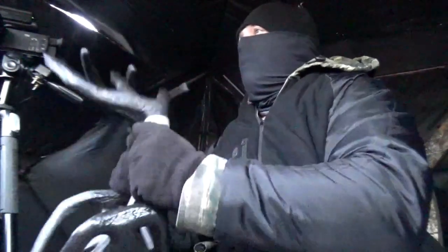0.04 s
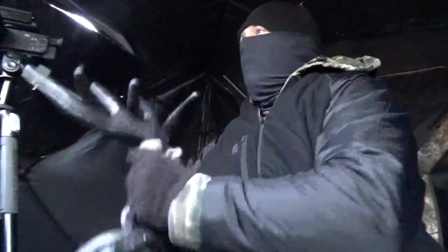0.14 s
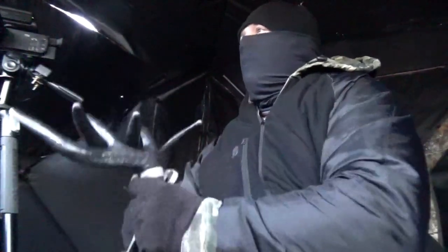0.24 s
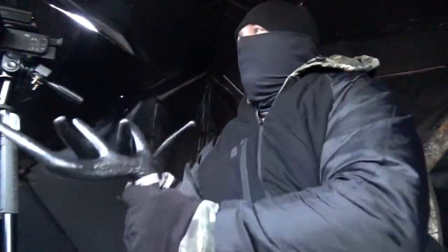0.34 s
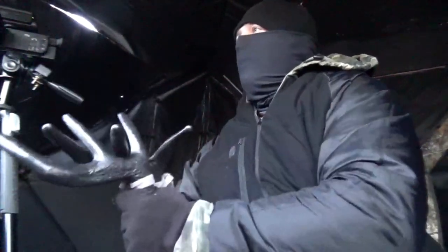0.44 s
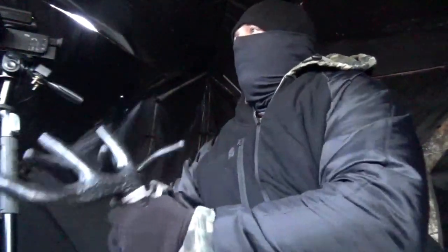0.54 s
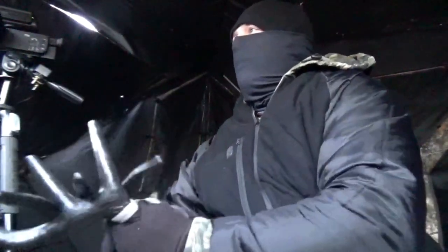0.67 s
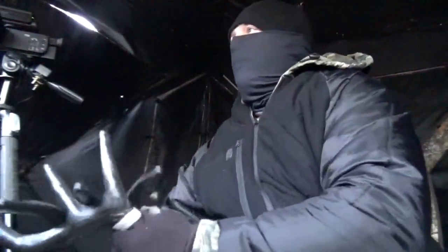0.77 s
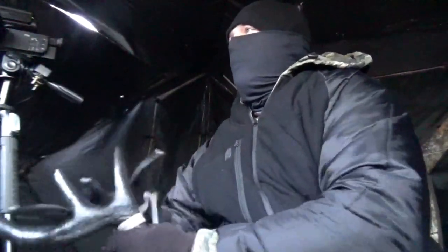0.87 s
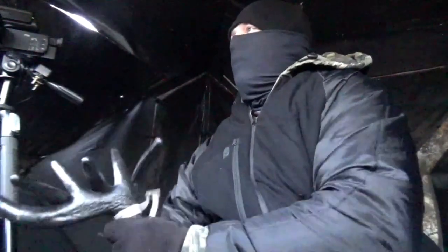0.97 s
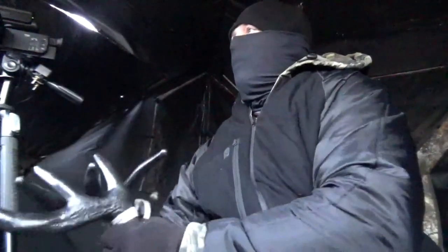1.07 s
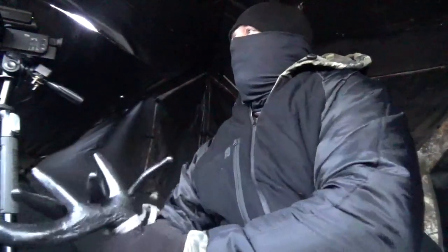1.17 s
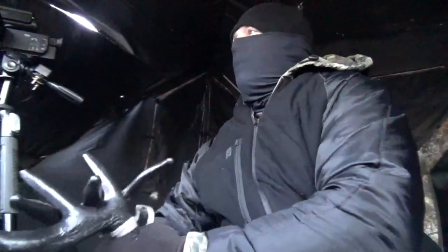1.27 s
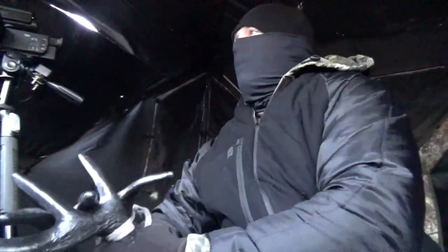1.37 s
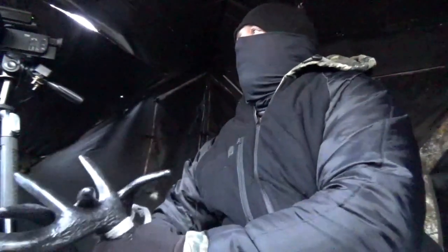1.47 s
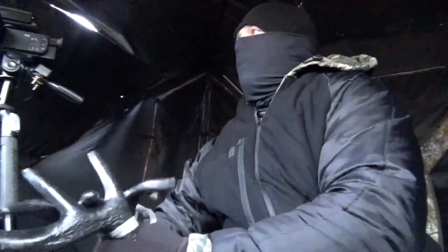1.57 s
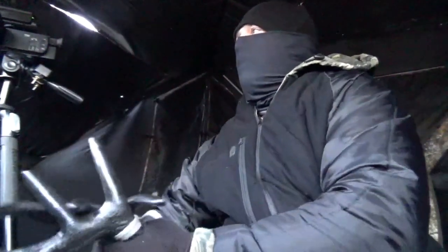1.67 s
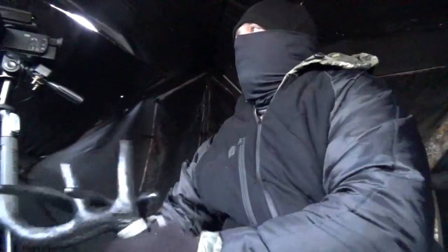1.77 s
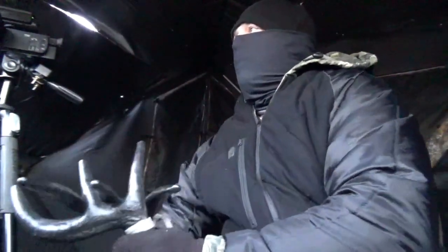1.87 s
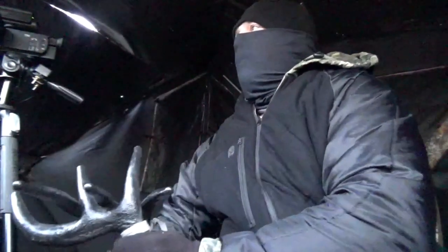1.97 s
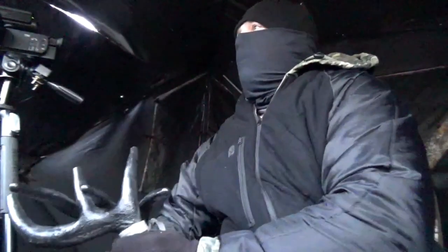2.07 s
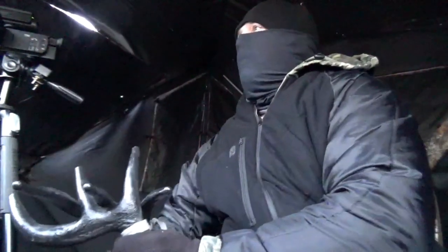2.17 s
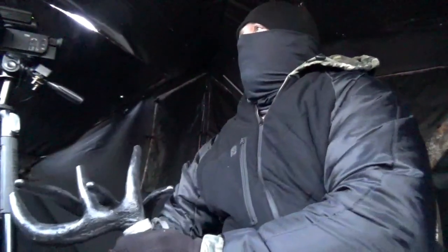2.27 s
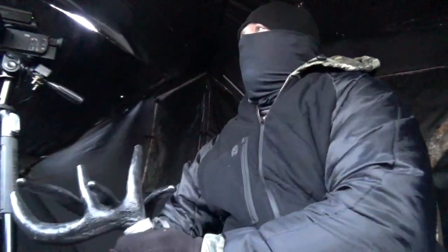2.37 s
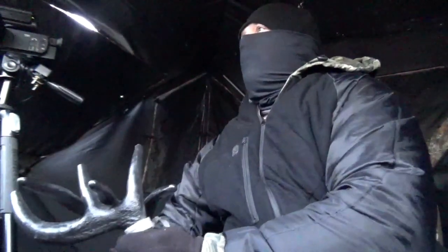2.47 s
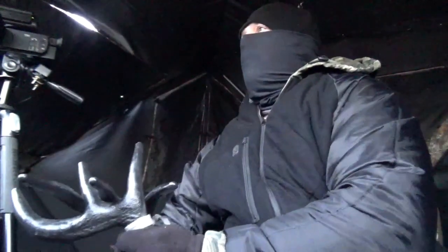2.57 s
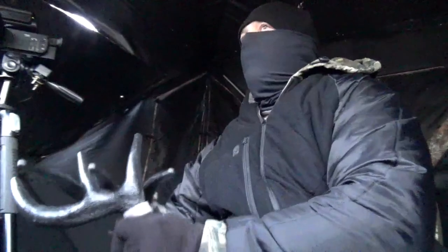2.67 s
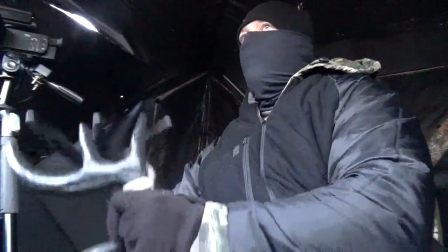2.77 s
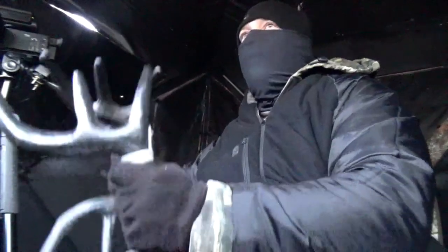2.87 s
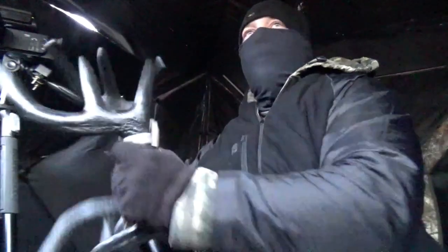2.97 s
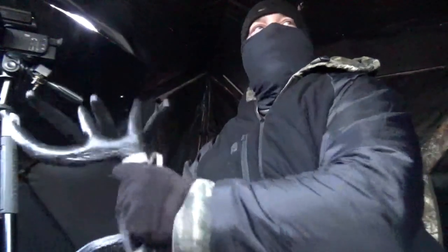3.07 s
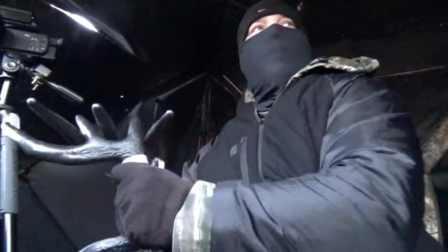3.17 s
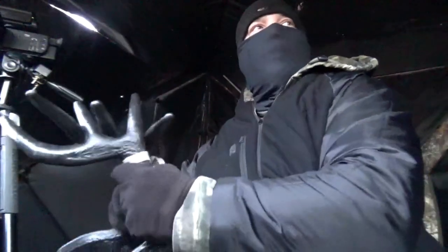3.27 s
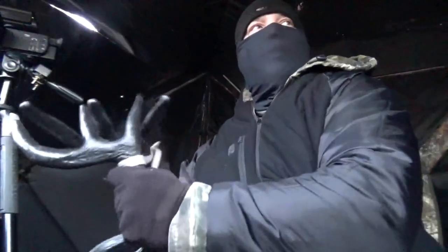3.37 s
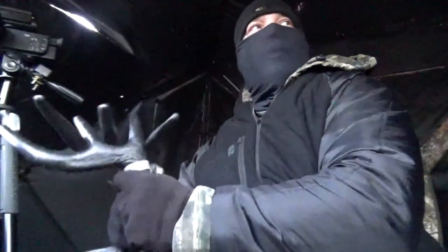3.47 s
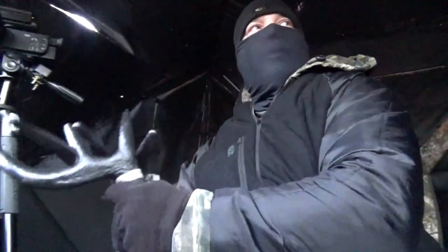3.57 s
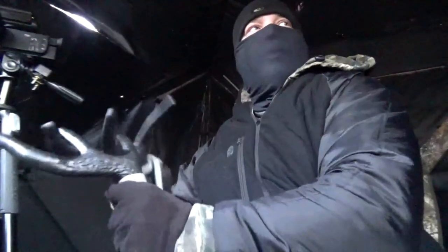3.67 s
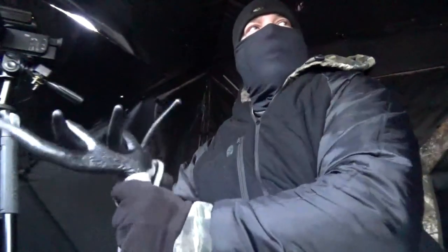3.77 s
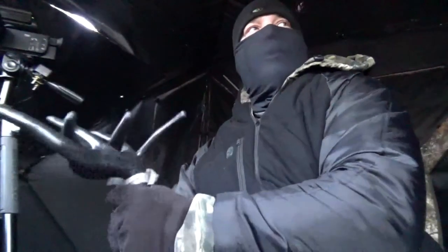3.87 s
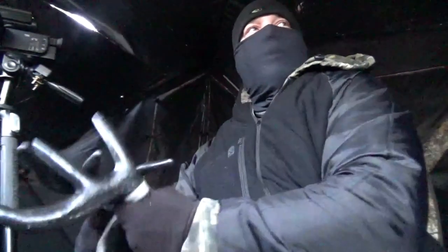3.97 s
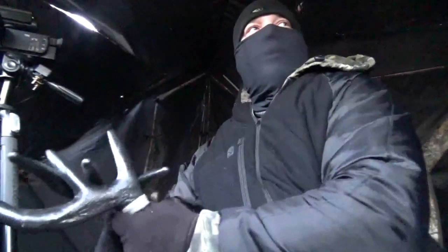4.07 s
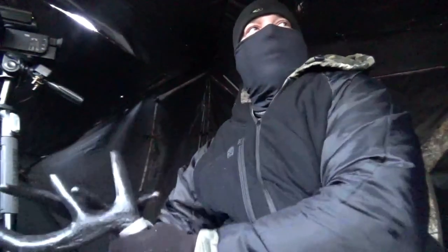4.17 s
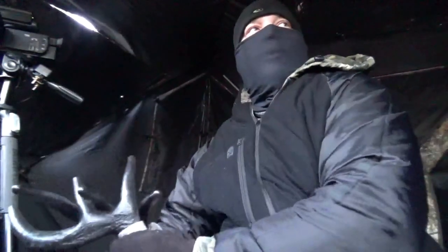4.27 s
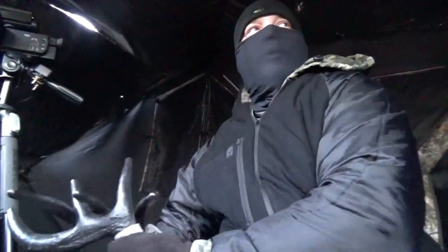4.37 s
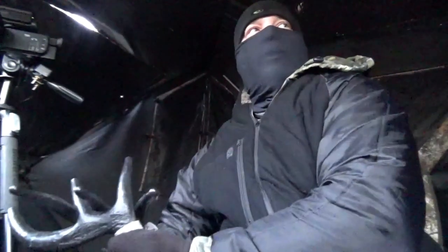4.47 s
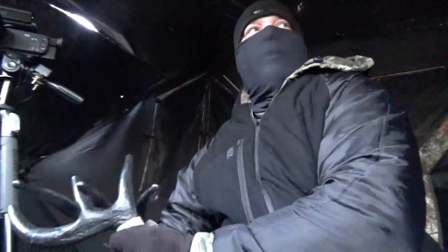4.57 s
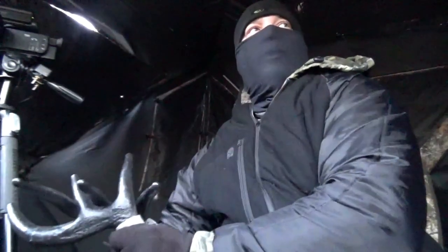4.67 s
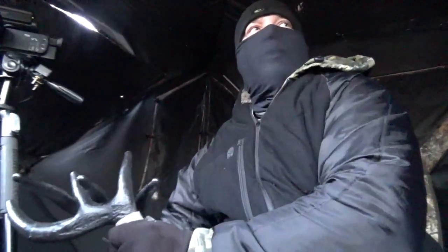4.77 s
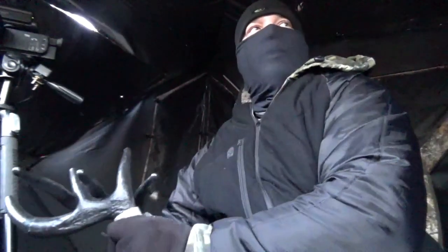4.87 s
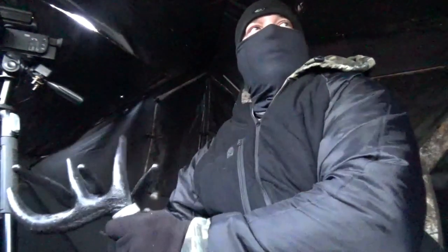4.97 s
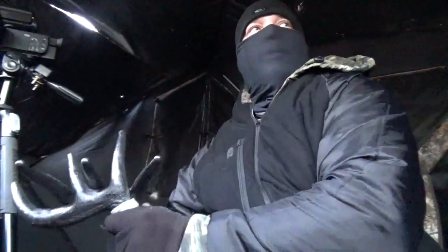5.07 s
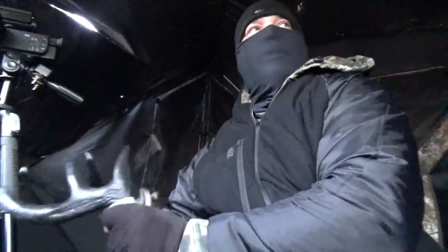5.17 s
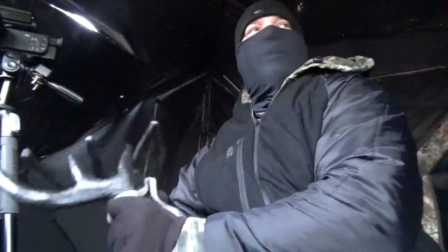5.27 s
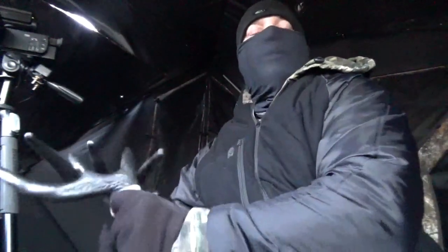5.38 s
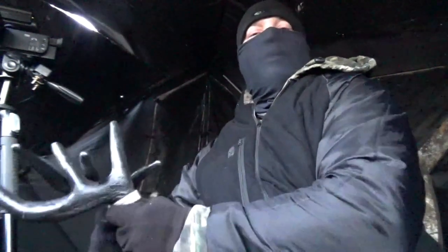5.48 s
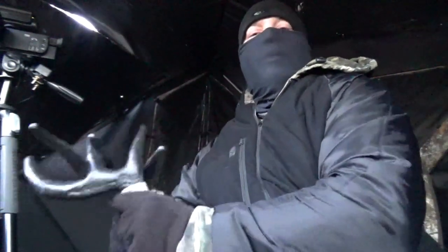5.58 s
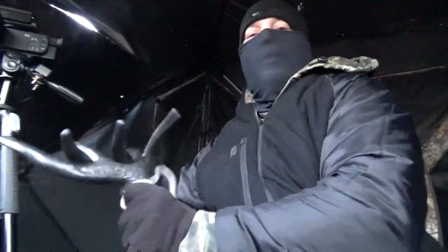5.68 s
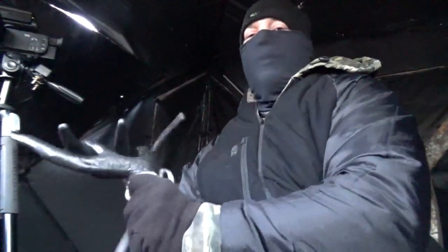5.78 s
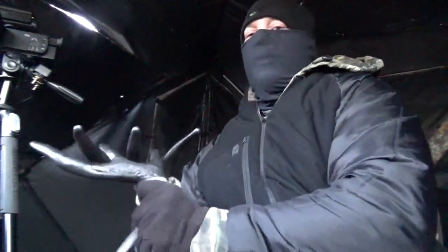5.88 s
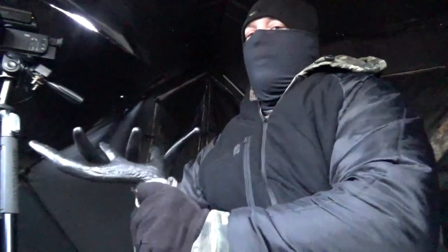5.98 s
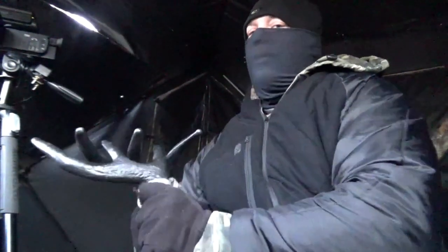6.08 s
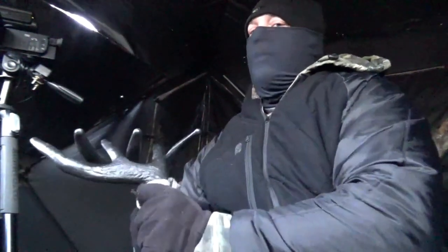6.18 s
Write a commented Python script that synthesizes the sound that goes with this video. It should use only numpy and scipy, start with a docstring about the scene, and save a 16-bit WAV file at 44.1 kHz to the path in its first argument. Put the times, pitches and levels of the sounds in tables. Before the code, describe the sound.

Close, dry stereo sound in a small fabric blind, slightly stronger on the left. Antlers clash almost at once: a crack at 0.03 s, then a rapid clatter at 0.14-0.2 s, a single knock near 0.38, and tight clusters around 0.6-0.7 and 0.85-1.15 s, with gritty scrapes between. After faint rubbing, another burst of clacks comes at 1.6-1.75 s, with a low scrape and weak knock near 1.8. From 2.0 to 3.0 s it is nearly quiet: bassy hiss, faint wavering low hum, tiny fast ticking, light rubbing from about 2.7. A hard flurry fills 3.0-4.06 s, with bright, bony cracks, some slightly overloaded. Light scrapes fade by 4.3 s; another lull follows. From 4.95 s scrapes swell into clattering at 5.2-5.3 and 5.42-5.72 s, then faint low knocks and rubbing near 5.85 fade into hiss by the end.

```python
"""Antlers clash at once and grind together, close by in a fabric hunting blind, for six seconds.
Each clash is a decaying noise blow plus gritty tine chatter, filtered by the antler modes.
Scrapes swell and fade; grinding drags on between blows; the fabric adds a short noise-tail echo.
Coloured hiss, a wavering hum sine and a faint regular tick fill the pauses. Loud peaks overload."""
import sys
import numpy as np
from scipy import signal
from scipy.fft import rfft, irfft, next_fast_len
from scipy.io import wavfile
from scipy.ndimage import map_coordinates

SR = 44100
rng = np.random.default_rng(int(sys.argv[2]) if len(sys.argv) > 2 else 0)


def wrap_up_sound(samples):
    """Save the sound to the file named by the first command line argument, as 16-bit audio."""
    columns = np.atleast_2d(samples).T
    # keep every value between -1 and 1, then stretch to whole-number steps
    tamed = np.clip(columns, -1, 1)
    steps = np.round(tamed * 32767).astype(np.int16)
    wavfile.write(sys.argv[1], SR, steps)


N = 275184


def amp(db):
    """dB to gain."""
    return 10 ** (np.asarray(db) / 20)


def unit(x):
    """Scaled to rms 1."""
    return x / np.sqrt(np.mean(x ** 2) + 1e-20)


def along(points, hz):
    """(Hz, value) points interpolated on a log frequency axis."""
    point_hz, values = np.transpose(points)
    return np.interp(np.log(hz + 1), np.log(point_hz + 1), values)


def curves(rows):
    """One value per sample for each column after the time."""
    times_s, *columns = np.transpose(rows)
    return [np.interp(np.arange(N) / SR, times_s, column) for column in columns]


def wobble(rate_hz):
    """Smooth random curve, rate_hz knots a second."""
    knots = rng.standard_normal(int(N * rate_hz / SR) + 4)
    return map_coordinates(knots, [np.arange(N) * rate_hz / SR])


def filtered(x, response):
    """x times a complex response of frequency."""
    n = x.shape[-1]
    size = next_fast_len(n + 8192)
    spectrum = rfft(x, size) * response(np.fft.rfftfreq(size, 1 / SR))
    return irfft(spectrum, size)[..., :n]


def gritty(shape, spread_db):
    """Noise made of tiny contacts of very uneven size, rms 1."""
    sizes_db = spread_db * rng.exponential(1, shape)
    return unit(rng.standard_normal(shape) * amp(sizes_db))


# hiss colour: pitch_hz [Hz], density_db [dB per Hz, relative]
HISS_COLOUR = [(15, -56.5), (25, -40.5), (43, -11.5), (124, -4), (197, -9.5), (241, -13), (303, -22),
               (635, -24.5), (1080, -33), (1510, -31), (2050, -43), (3970, -39), (11000, -41.5),
               (14300, -79.5), (22000, -120)]
# left-right likeness of the hiss: pitch_hz [Hz], correlation [-1..1]
HISS_LIKENESS = [(60, 0.98), (220, 0.97), (800, 0.82), (2900, 0.77), (10600, 0.46)]
# hum level before its flutter: time_s [s], level_db [dB]
HUM_LEVEL = [(0.0, -61), (0.21, -51), (1.55, -52), (2.45, -43.5), (3.34, -55), (3.67, -44.5), (4.5, -57),
             (6.24, -48.5)]


def background():
    """Bass-heavy hiss, a sine hum wavering in level and phase, and decaying tick pings from the camera."""
    def mid_side(hz):
        turn = np.arccos(np.clip(along(HISS_LIKENESS, hz), -1, 1)) / 2
        return amp(along(HISS_COLOUR, hz)) * [np.cos(turn), np.sin(turn)]

    mid, side = filtered(rng.standard_normal((2, N)), mid_side)
    hiss = amp(-45.5 + 0.29 * wobble(4.7)) * unit(np.array([mid + side, mid - side]))
    t = np.arange(N) / SR
    hum_db = curves(HUM_LEVEL)[0] + 2.2 * wobble(25)
    hum = amp(hum_db) * np.sin(2 * np.pi * 119 * t + 0.5 * wobble(4.85))
    since_tick_s = (t - 0.027) % (1 / 30)
    tick_db = -68.5 + 1.5 * wobble(12) - 60 * since_tick_s / 0.011
    tick = amp(tick_db) * np.sin(2 * np.pi * 4050 * since_tick_s)
    return hiss + hum + tick


# fabric echo decay: pitch_hz [Hz], t60_s [s]
FABRIC_DECAY = [(300, 0.17), (800, 0.069), (2000, 0.098), (5500, .12), (10000, 0.12)]


def blind(x):
    """Fabric walls answer with a short noise tail, redrawn every eighth second as the antlers move."""
    out, step = np.zeros((2, N + SR)), SR // 8
    delay = 90  # samples
    for start in range(0, N, step):
        hz, t, z = signal.stft(rng.standard_normal((2, SR // 4)), SR, nperseg=256)
        decay = amp(-60 * t / along(FABRIC_DECAY, hz)[:, None])
        tail = signal.istft(z * decay, SR, nperseg=256)[1]
        tail[1] = 1.04 * tail[0] + 0.59 * tail[1]  # the two ports are close together
        tail = tail / np.linalg.norm(tail[0])
        wet = signal.fftconvolve(x[:, start:start + step], tail, axes=1)
        out[:, start + delay:][:, :wet.shape[1]] += wet
    return out[:, :N]


# antler modes: pitch_hz [Hz], width_hz [Hz], level_db [dB, relative]
ANTLER_MODES = [(405, 70, -5.5), (614, 74, 7), (845, 190, -2), (1227, 182, 5.5), (1590, 300, -6.5),
                (1927, 120, 7.5), (2247, 203, -5), (2645, 110, 5.5), (2955, 108, -3.5), (3120, 110, 3),
                (3940, 360, -2.5), (4510, 220, 6), (5130, 380, 1.5), (5400, 420, 2.5), (5938, 500, -1),
                (6130, 240, 3.5), (6600, 490, -6.5), (7300, 110, 3), (8300, 270, -8), (9680, 170, 6)]


def rings(hz, gains_db):
    """Causal response of the antler modes, alternating in sign, each with an extra gain."""
    total = 0
    for k, ((mode_hz, width_hz, db), gain_db) in enumerate(zip(ANTLER_MODES, gains_db)):
        damping = 1j * hz * width_hz
        total = total + (-1) ** k * amp(db + gain_db) * damping / (mode_hz ** 2 - hz ** 2 + damping)
    return total


# rubbing of bone and sleeves between blows: time_s [s], tip_hiss_db [dB]
GRIND_LEVEL = [(0.0, -49), (0.45, -56), (0.7, -44), (1.08, -43.5), (1.22, -55), (1.37, -49.5),
               (1.55, -61.5), (1.78, -44.5), (2.0, -59), (2.31, -62.5), (2.88, -49.5), (3.22, -50.5),
               (3.35, -51), (3.87, -44), (4.12, -57), (4.24, -44), (4.38, -61.5), (5.0, -59), (5.35, -47),
               (5.87, -47), (5.96, -58.5), (6.24, -60.5)]
# broad colour of rubbing: pitch_hz [Hz], density_db [dB per Hz, relative]
RUB_COLOUR = [(120, -38.5), (200, 5.5), (495, -1), (692, -12), (818, -6.5), (1090, 1), (2930, 2),
              (4520, 2.5), (5720, 11), (11000, 0), (14300, -54.5), (22000, -120)]
RUB_KNOCK_DB, RUB_BASS_DB = -2, -2  # over the hiss of the tips


def grind():
    """Rough surfaces drag and feed the antler modes: tips hiss, beams rasp and rumble."""
    level_db, = curves(GRIND_LEVEL)
    body = lambda hz: amp(along(RUB_COLOUR, hz) - 1) + rings(hz, np.zeros(len(ANTLER_MODES)))
    grit = filtered(gritty(N, spread_db=2.5) * amp(0.69 * wobble(60)), body)
    below_1200, below_3500 = filtered(grit, lambda hz: 1 / (1 + (hz / [[1200], [3500]]) ** 6))
    tips = unit(grit - below_3500)
    rasp = amp(RUB_KNOCK_DB) * unit(below_3500 - below_1200)
    rumble = amp(RUB_BASS_DB) * unit(below_1200)
    return amp(level_db) * (tips + rasp + rumble) * amp([[0.4], [-0.4]])


# edges of the bass, knock, click and treble bands: pitch_hz [Hz]
BAND_EDGES_HZ = [300, 1200, 3500, 7500, 11000]


def voice(hz, bands_db, gains_db):
    """Antler response to one contact: a broad crack plus the modes, set to a relative level per band."""
    body = amp(-0.5) + amp(1.0) * rings(hz, gains_db)
    power = [2 * np.sum(np.abs(body[(hz > low) & (hz < high)]) ** 2) / len(hz)
             for low, high in zip(BAND_EDGES_HZ, BAND_EDGES_HZ[1:])]
    bass, knock, click, treble = bands_db - 10 * np.log10(power)
    colour = [(150, bass - 22), (380, bass - 3), (1050, bass), (1350, knock), (3200, knock),
              (3800, click), (7200, click), (8000, treble + 2), (11000, treble - 3)]
    return amp(along(colour, hz) + 6.0) * body


# extra lean close to the left port: pitch_hz [Hz], left_over_right_db [dB]
LEFT_LEAN = [(300, 1), (800, 1.5), (2000, -0.26)]
TINE_HZ, TINE_DB = 5814, 10  # the long tines ring at every contact
PORT_LAG_S = 6e-6  # spread of the arrival gap between the two ports as the antlers move


def add(out, start_s, force, click_db, knock_db, bass_db, treble_db, ring_hz, ring_db, pan_db):
    """Add one contact: where it lands decides which modes speak."""
    modes_hz = np.array(ANTLER_MODES)[:, 0]
    near = lambda hz: np.exp(-(np.log(modes_hz / hz) / 0.097) ** 2)
    gains_db = ring_db * near(ring_hz) + TINE_DB * near(TINE_HZ) + rng.normal(0, 2.06, len(modes_hz))
    bands_db = click_db + np.array([bass_db, knock_db, 0, treble_db])
    lag_s = rng.normal(0, PORT_LAG_S) * np.array([[1], [-1]])

    def response(hz):
        lean = amp(along(LEFT_LEAN, hz) / [[2], [-2]])
        return voice(hz, bands_db, gains_db) * np.exp(1j * np.pi * hz * lag_s) * lean

    hit = filtered(force, response) * amp([[pan_db / 2], [-pan_db / 2]])
    out[:, round(start_s * SR):][:, :hit.shape[1]] += hit


# slides without a blow: start_s [s], click_db [dB, relative], knock_db, bass_db, treble_db [dB over click],
# ring_hz [Hz], ring_db [dB lift of the modes near ring_hz], length_s [s, floored in scrapes()]
SCRAPE_EVENTS = [(0.13, -38, 4, -1, -6, 1660, 9, 0.005), (0.346, -46.5, 8.5, -2, -10, 3040, 8.9, 0.032),
                 (0.538, -39, 4, -1, -8, 1580, 9.8, 0.042), (0.574, -36, -1, -3.5, -9, 596, 10, 0.016),
                 (0.818, -35, 12, 1.5, -11.5, 2300, 12, 0.016),
                 (0.975, -32.5, -19.5, -18.5, -9.5, 7300, 4, 0.025),
                 (1.003, -26.5, -4, -4, -14.5, 7160, 22, 0.0058), (1.108, -49, 1.5, 8, -12, 880, 8, 0.0049),
                 (1.34, -42.5, 1, -3, -4, 1640, 11, 0.027), (1.395, -45.5, -1.5, -5, -9.5, 1510, 12, 0.02),
                 (1.583, -45.5, -3, -6, -8, 4480, 10, 0.02), (1.807, -32, 2, 4.5, -7, 420, 32, 0.015),
                 (1.96, -54, -1, -17, -9, 6490, 10, 0.025), (2.703, -45, 2, -7, -7, 2100, 15, 0.015),
                 (2.717, -45.5, 0, -4.5, -7, 2760, 7.7, 0.022), (2.77, -46, -4, -4, -5, 2020, 11, 0.021),
                 (3.01, -44, 6, 6, -5, 3140, 11, 0.008), (3.021, -36, 11, 11.5, -8, 3060, 8, 0.0025),
                 (3.1, -37, 3.5, 5, -11, 880, 11, 0.024), (3.246, -35.5, 9, -7, -7, 1800, 10, 0.0078),
                 (3.355, -36.5, 0, 2, -13, 6500, 4, 0.015), (3.641, -41, 6, 1, -6, 2820, 10, 0.01),
                 (3.744, -28, 0, -13, -4, 6200, 7.4, 0.023), (3.907, -34.5, 3, 5, -9, 890, 9.1, 0.01),
                 (3.923, -29, 5, -8, -9, 1240, 13, 0.0092), (4.21, -44, -3.5, -9, -6, 2960, 13, 0.03),
                 (4.953, -48, 3, 0, -9, 2170, 10, 0.025), (4.976, -43.5, 9, 7, -11, 2000, 16, 0.0071),
                 (5.0, -37.5, 11, 5, -9, 2200, 17, 0.019), (5.091, -46, 4.5, 2.5, -4, 2150, 11, 0.06),
                 (5.145, -36, 9.5, -1.5, -11, 1600, 14, 0.016),
                 (5.163, -30.5, 6.5, -7, -13, 1690, 10, 0.022),
                 (5.183, -21.5, -3.5, -10, -10, 2260, 13, 0.011),
                 (5.485, -21, -10, -22, -10, 6000, 6.7, 0.017), (5.632, -44.5, 4.5, 12, -15, 393, 40, 0.04),
                 (5.664, -28, -6, -1, -9, 390, 27, 0.013)]
PAN_SCRAPE_DB = 1.5  # left over right


def scrapes():
    """Slides: gritty contact force that swells and fades with no blow."""
    out, t = np.zeros((2, N + SR)), np.arange(SR // 8) / SR
    for start_s, *tone, length_s in SCRAPE_EVENTS:
        u = t / max(length_s, 0.002)
        force = 2 * u * np.exp(-u ** 2) * gritty(len(t), spread_db=1.5)
        add(out, start_s, force, *tone, PAN_SCRAPE_DB)
    return out[:, :N]


# blows: start_s [s], click_db [dB, relative, chatter], knock_db, bass_db, treble_db [dB over click],
# ring_hz [Hz], ring_db [dB lift of the modes near ring_hz], blow_db [dB, blow over chatter]
BLOW_EVENTS = [(0.0254, -30, 0.5, -5, -17, 4240, 16, 19.7), (0.1384, -12.5, 1, -4.5, -9.5, 4030, 13, 3.4),
               (0.148, -16.5, -7, -3, -6.5, 4330, 8.9, 5.4), (0.159, -14, -8.5, -16, -5, 2330, 11, 9.8),
               (0.18, -14.5, -4, -18, -6.5, 3170, 12, 8.2), (0.201, -18, 1.5, -8.5, -8, 2920, 4.9, 5.9),
               (0.3762, -22.5, -5.5, -18.5, -13, 1277, 12, 21.9), (0.6035, -27, 3, -4, 1.5, 2490, 7, 14.2),
               (0.65, -20.5, -4, -20, -17.5, 1790, 6.4, 15.7), (0.667, -14.5, 1, -15, -13, 2910, 20, 8.6),
               (0.683, -12.5, 1.5, -6.5, -16, 2910, 12, 5.4), (0.699, -18, 4, -4, -15.5, 1930, 6.3, 11.5),
               (0.71, -26.5, 6, 6, -11, 2720, 5.5, 18.5), (0.8529, -23.5, 5.5, -8, -8, 2260, 10.4, 16.3),
               (0.898, -22.5, 2.5, -1.5, -12.5, 1780, 8, 15.3), (0.908, -17, -17, -16, -9.5, 4100, 4, 13.6),
               (0.922, -12.5, -7, -16.5, -9.5, 5750, 15, 5.2), (0.955, -20, -7.5, -13, -8.5, 6960, 23, 7.9),
               (1.0143, -20, -3.5, -16, -13, 3040, 7, 17), (1.0382, -16, -2.5, -15, -11, 3830, 13.4, 12.2),
               (1.151, -23.5, -6, -16, -8, 3020, 8.4, 19.7), (1.297, -42, -14, -25, -11, 6800, 34, 18.5),
               (1.5015, -62, -11, -4, -10, 2120, 10, 19), (1.538, -59.5, -6, -5, -6.5, 895, 8, 17),
               (1.611, -29, -7, -7, -12, 385, 24, 14), (1.6355, -23.5, -5, -13.5, -8.5, 3320, 12, 11.8),
               (1.672, -14, -4, -17.5, -16.5, 2980, 15, 7.2), (1.687, -19.5, -4, -12, -15, 1830, 12, 15.8),
               (1.709, -14, 0.5, -35, -14, 1750, 15, 6.8), (1.722, -16, -6, -18.5, -18, 4070, 15, 8.5),
               (1.826, -30.5, -3, -5.5, -7, 420, 20, 17.2), (1.8762, -42, -8, -31, -7, 6470, 12, 15),
               (2.007, -57, -1, -7, -10, 3620, 11, 11), (3.0277, -18.5, 3, -10.5, -15, 2920, 13, 14),
               (3.0379, -13, 0.5, -7, -18.5, 1940, 13, 12), (3.05, -14.5, 3.5, -7, -12, 2880, 7.8, 11),
               (3.068, -12.5, 0, 2.5, -12, 3830, 13, 4.3), (3.08, -24.5, 4, 5.5, -12, 497, 15, 10),
               (3.256, -12.5, -8, -15.5, -11.5, 5340, 6.3, 9.8),
               (3.267, -16, -1, -16, -10.5, 3900, 5.3, 9.8),
               (3.289, -20.5, -3.5, -15.5, -14, 4900, 8.3, 16.4),
               (3.3754, -10.5, -2, -29, -7, 2800, 33, 5.7), (3.383, -11, -8, -28, -14, 5210, 20, 3.5),
               (3.4, -16, -4.5, -13, -11.5, 2900, 17, 13), (3.442, -37.5, 6.5, -10, -18, 1480, 5.3, 24.2),
               (3.5277, -12.5, -3.5, -17.5, -10, 5300, 6.6, 5.5),
               (3.545, -13.5, -4, -22, -15, 3060, 9.7, 6.6),
               (3.6557, -16, -5.5, -24, -10.5, 1370, 12, 12.2), (3.67, -16, -4, -9, -10.5, 6700, 11, 7.4),
               (3.688, -23, 7.5, 3.5, -8.5, 820, 13, 9.5), (3.725, -20, 0, -6, -5.5, 1540, 12, 17),
               (3.785, -19, -4.5, -16, -12.5, 5730, 12, 18), (3.799, -16, -1, -15.5, -14.5, 2680, 9.6, 7.9),
               (3.94, -28, -1, -14, -8.5, 5540, 7.5, 16.6), (3.956, -22, -1.5, -10, -19, 6600, 7.1, 16.4),
               (3.963, -22, 2.5, 0, -14.5, 1470, 3.5, 18), (3.991, -17.5, -4.5, -32, -14, 5840, 49, 18.4),
               (4.006, -13.5, -1, -8, -12.5, 5740, 5, 5.2), (4.0582, -19, -0.5, -19, -16.5, 2270, 17, 14.7),
               (4.1804, -34, -10, -14, -2, 7100, 13, 14), (4.272, -43, -16, -25, -8, 6560, 16, 17.3),
               (4.992, -31.5, 3.5, -3, -16, 2120, 19, 11), (5.208, -14, -2, -6.5, -5.5, 2160, 7.9, 8.1),
               (5.228, -16, -8.5, -24, -5, 4980, 8.2, 9), (5.249, -14, 2.5, -7.5, -11, 3500, 11, 8.1),
               (5.263, -19, 4.5, -5.5, -4.5, 1200, 7.6, 8), (5.285, -28.5, 4, 1.5, -4.5, 840, 18, 19),
               (5.351, -51.5, 13, 16, -7, 1170, 8.1, 20.5), (5.417, -19, 0, -13, -4, 880, 7, 3.5),
               (5.421, -23, -5, -4.5, -5, 6500, 8, 10.2), (5.426, -25.5, -5.5, -9, -5, 2720, 13, 19),
               (5.441, -21, -12, -34, -4, 6510, 7.9, 12), (5.4546, -12.5, -11, -37, -15, 6000, 12, 12),
               (5.468, -12.5, -5.5, -13.5, -12.5, 2860, 12, 7.2), (5.552, -41.5, 6, 12.5, -15, 870, 11, 5),
               (5.566, -15, -2.5, -39, -23, 1590, 8.2, 10.5), (5.587, -24, 3.5, -12, -18, 1520, 4.7, 9.3),
               (5.6941, -17.5, 2.5, -4.5, -17, 2050, 7.9, 14.4), (5.706, -21, 1, -1, -10, 1910, 8.4, 8.1),
               (5.719, -12, -2, -11.5, -9, 2460, 7.4, 3.7), (5.808, -45, 2, 2, -4, 554, 7.2, 11),
               (5.849, -43.5, 1, 7, -4, 830, 10, 11), (5.869, -51, -11, 2, -4, 500, 10, 7.5),
               (5.884, -53.5, 11.5, 11, -8, 1320, 18, 16)]
CHATTER_S = 0.023  # longest chatter fade time; a sooner next blow shortens it
PAUSE_S = 0.03  # a blow after a longer gap starts a new clash
PAN_NEW_DB, PAN_ON_DB = 1.6, 1.5  # left over right: first blow of a clash, later blows


def clashes():
    """Tines meet in a sharp noise blow, then chatter past each other, fading as they slide free."""
    out, t = np.zeros((2, N + SR)), np.arange(SR // 8) / SR
    gaps_s = np.diff([-1, *(row[0] for row in BLOW_EVENTS), N / SR])
    for (start_s, *tone, blow_db), before_s, after_s in zip(BLOW_EVENTS, gaps_s, gaps_s[1:]):
        swell = 1 - np.exp(-t / 0.0015)
        fade = np.exp(-(t / min(after_s, CHATTER_S)) ** 2)
        chatter = swell * fade * gritty(len(t), spread_db=2.5)
        blow = amp(blow_db - 60 * t / 0.0078) * rng.standard_normal(len(t))
        pan_db = PAN_NEW_DB if before_s > PAUSE_S else PAN_ON_DB
        add(out, start_s, chatter + blow, *tone, pan_db)
    return out[:, :N]


def scene():
    """Antlers, their echo in the blind and the background."""
    antlers = clashes() + scrapes() + grind()
    return antlers + amp(-5.0) * blind(antlers) + background()


MIC_HZ, TOP_HZ = 11200, 16000  # band limits before and after overload


def record(dry):
    """Band-limited microphone; overload flattens peaks and spills weakly above the limit."""
    edge = lambda hz, top_hz: np.sin(np.pi / 2 * np.clip((top_hz - hz) / 250, 0, 1)) ** 2
    heard = filtered(dry, lambda hz: edge(hz, MIC_HZ))
    hardness = 8
    flat = heard / (1 + np.abs(heard / 0.86) ** hardness) ** (1 / hardness)
    shelf = lambda hz: amp(-4.0) + (1 - amp(-6.0)) * edge(hz, MIC_HZ)
    return filtered(flat, lambda hz: shelf(hz) * edge(hz, TOP_HZ))


dry = scene()
out = record(dry)
wrap_up_sound(out)
```